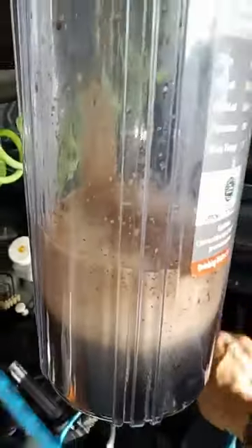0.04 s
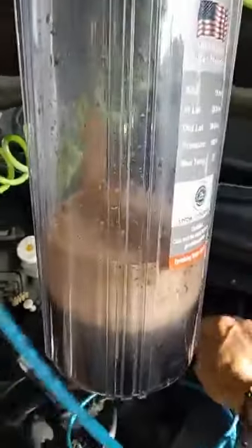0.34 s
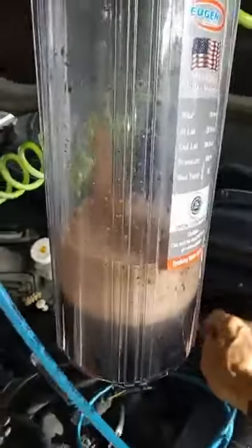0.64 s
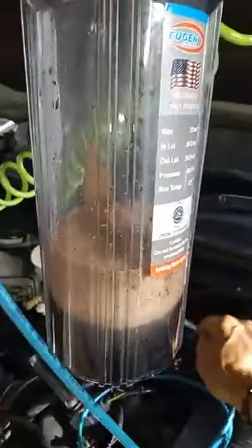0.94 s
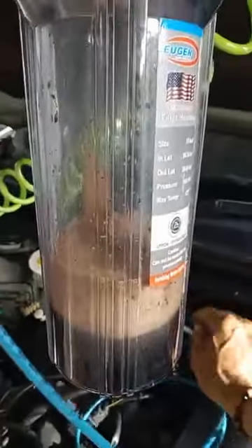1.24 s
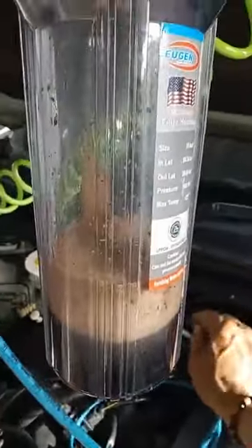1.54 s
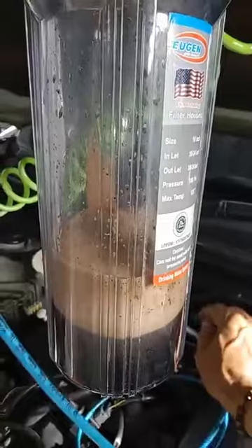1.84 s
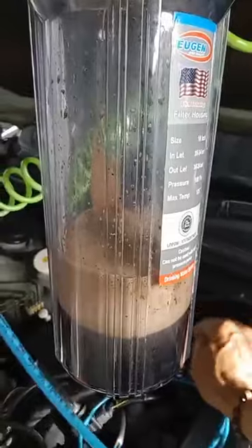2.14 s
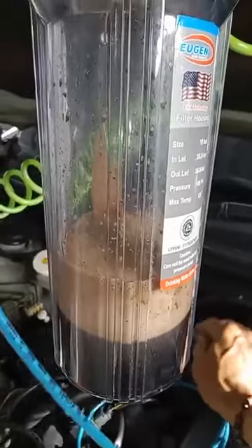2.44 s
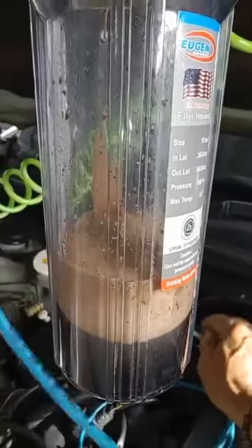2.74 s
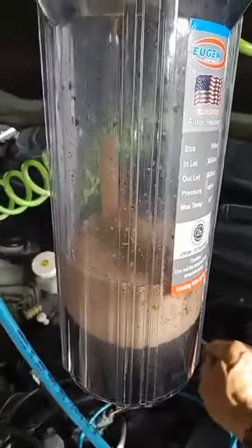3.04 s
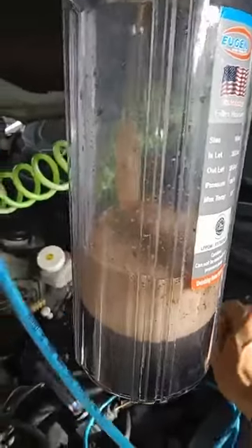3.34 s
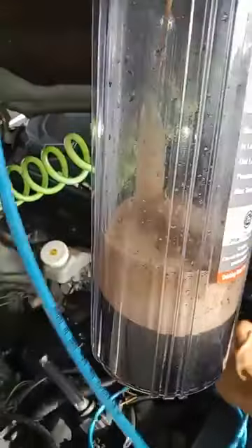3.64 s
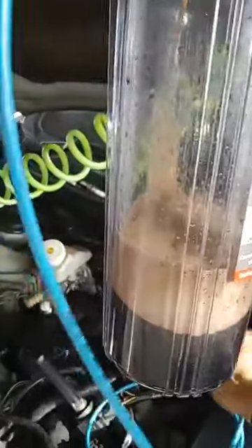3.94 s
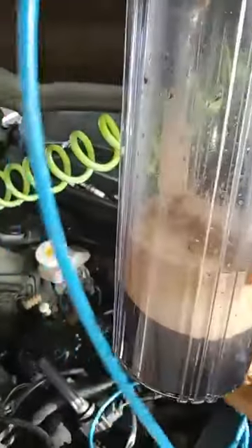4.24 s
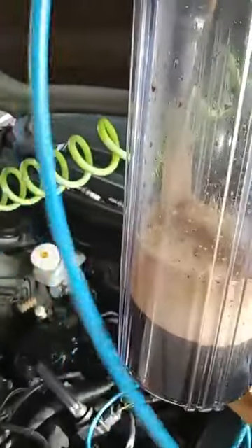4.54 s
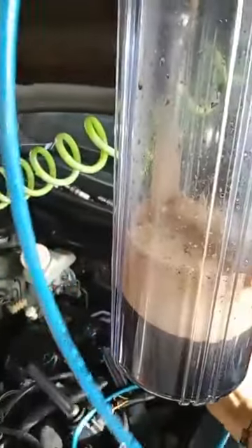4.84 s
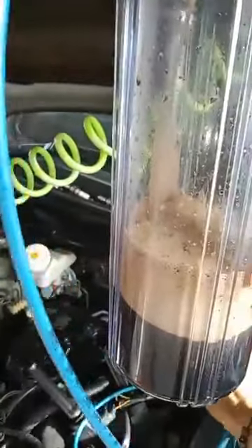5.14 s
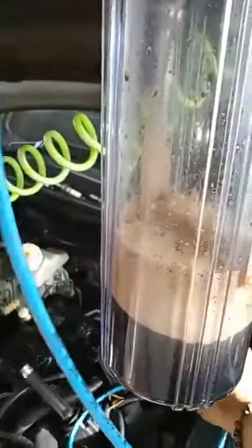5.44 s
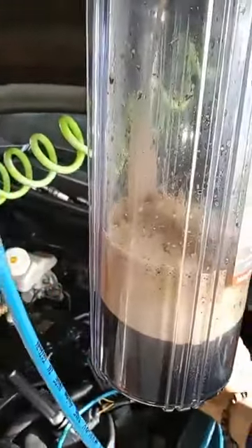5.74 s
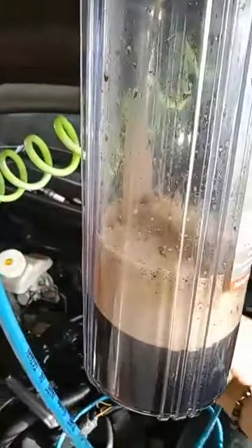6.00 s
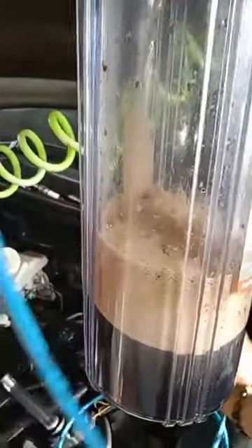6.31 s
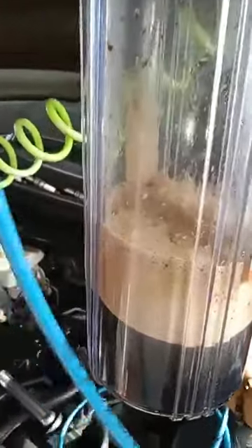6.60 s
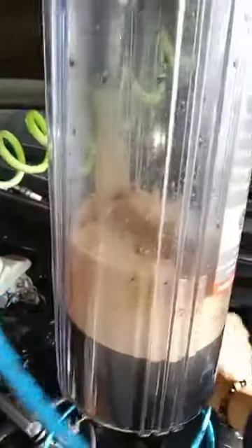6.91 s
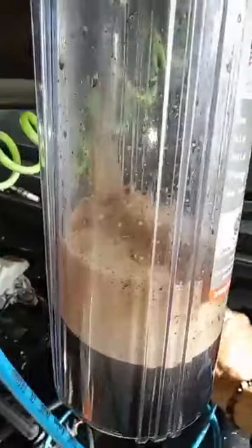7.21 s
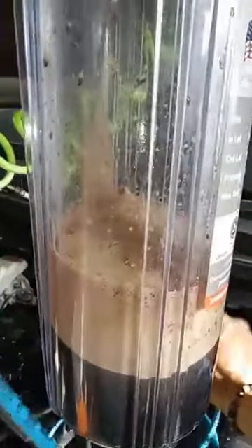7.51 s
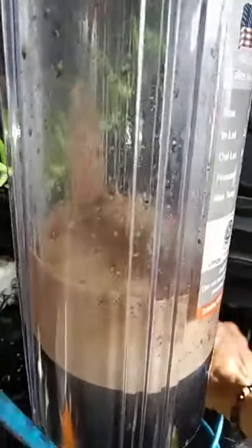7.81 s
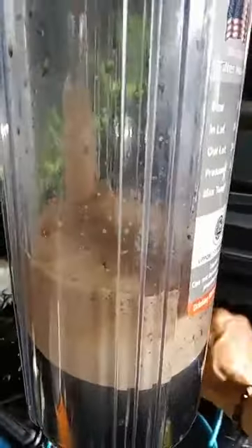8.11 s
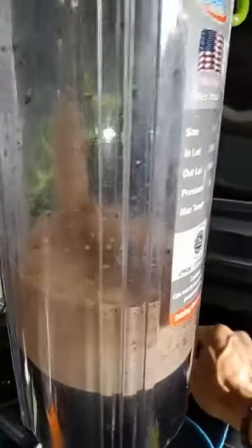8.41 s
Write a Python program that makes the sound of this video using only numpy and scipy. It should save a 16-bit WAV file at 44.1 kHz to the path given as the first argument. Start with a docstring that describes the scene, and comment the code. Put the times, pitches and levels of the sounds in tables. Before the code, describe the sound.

A suction pump runs with a steady low hum while liquid jets into a filter canister with a bright, even hiss. Spray sizzles against the wall, froth fizzes and a faint high whine sits on top. The close, hand-held microphone drifts around the canister, so the hiss slowly changes colour. Near the end come a few soft handling knocks.

```python
"""A steady vacuum-pump hum under the hiss of foaming liquid sucked into a filter canister.
The pump puffs once a turn and a valve sings faintly in step. The jet rings the air in hose and
canister, spray sizzles on the wall and the froth fizzes. A hand-held microphone drifts around it,
so close reflections shift the colour of the hiss; a few soft handling knocks come late."""
import sys
import numpy as np
from scipy import signal
from scipy.fft import rfft, irfft, next_fast_len
from scipy.io import wavfile
from scipy.ndimage import map_coordinates

SR = 44100
rng = np.random.default_rng(int(sys.argv[2]) if len(sys.argv) > 2 else 0)


def unload_audio(sound):
    """Save the sound as a 16-bit wav file, at the path given as the first command line argument."""
    columns = np.transpose(np.atleast_2d(sound))
    # keep every value between -1 and 1, then stretch to whole-number steps
    steps = np.round(np.clip(columns, -1, 1) * 32767)
    wavfile.write(sys.argv[1], SR, steps.astype(np.int16))


N = 377496
TIME = np.arange(N) / SR
PUMP_HZ = 45.6


def amp(db):
    """Decibels to gain."""
    return 10 ** (np.asarray(db) / 20)


def unit(x):
    """Scaled to rms 1."""
    return x / np.sqrt(np.mean(x ** 2))


def curves(rows):
    """One value per sample for each column after the time."""
    time_s, *columns = np.transpose(rows)
    return [np.interp(TIME, time_s, column) for column in columns]


def wobble(rate_hz):
    """Smooth random curve, rate_hz knots a second."""
    return map_coordinates(rng.standard_normal(int(N * rate_hz / SR) + 4), [TIME * rate_hz])


def filtered(x, response):
    """Zero-phase filter of gain response(hz)."""
    size = next_fast_len(N + SR // 4)
    return irfft(rfft(x, size) * response(np.fft.rfftfreq(size, 1 / SR)), size)[:N]


def coloured(x, spectrum):
    """x shaped by (freq_hz, gain_db) points, at rms 1."""
    freq_hz, gain_db = np.transpose(spectrum)
    return unit(filtered(x, lambda hz: amp(np.interp(np.log(hz + 1), np.log(freq_hz), gain_db))))


def rush(spectrum):
    """Smooth turbulent noise."""
    return coloured(rng.standard_normal(N), spectrum)


def droplets(spectrum, rate_hz, grain_db):
    """Tiny impacts of random size on a bed of turbulence."""
    hits = (rng.random(N) < rate_hz / SR) * rng.standard_normal(N)
    return coloured(rng.standard_normal(N) + amp(grain_db) * unit(hits), spectrum)


# Drift round and back from the canister: time_s, around_fraction, back_fraction
MIC_PATH = [(0, .6, 0), (.5, .2, 0.27), (1.05, 0.03, 0.43), (2.2, 0.1, 0.52), (3.1, 0.14, .48),
            (3.4, 0.63, .72), (4.4, 0.79, 0.91), (5.2, 0.77, .85), (6, 0.85, 0.29), (6.4, 0.81, 0.1),
            (7.3, 0.87, 0.09), (8.56, 0.94, 0.05)]


def at_mic(triple):
    """Value along the microphone's path of a mic triple: (base, change around, change back)."""
    base, per_around, per_back = triple
    around, back = curves(MIC_PATH)
    return base + per_around * around + per_back * back


# Pump overtones before and after the microphone's move: harmonic, gain_db
HUM_BEFORE = [(1, -43), (2, -20), (3, -18), (4, -11), (5, -9), (6, -12.5), (7, -1.5), (8, -11), (9, -15.5),
              (10, -6.5), (11, -19), (12, 0), (13, -5), (14, -3), (15, -4), (16, -25), (17, -19),
              (18, -9.5), (19, -19), (20, -10.5), (21, -18), (22, -11), (23, -13.5), (24, -15), (25, -32),
              (26, -20), (27, -32), (28, -13), (29, -11.5), (30, -14.5), (31, -21), (32, -14), (33, -26)]
HUM_AFTER = [(1, -46), (2, -15.5), (3, -16), (4, -8.5), (5, -8), (6, -14), (7, 0), (8, -9), (9, -19.5),
             (10, -5), (11, -32), (12, 0.5), (13, -6), (14, -2), (15, -4.5), (16, -21.5), (17, -14),
             (18, -4), (19, -26), (20, -14.5), (21, -10.5), (22, -20), (23, -8.5), (24, -11), (25, -15),
             (26, -10), (27, -20), (28, -16), (29, -8.5), (30, -16), (31, -18), (32, -12.5), (33, -13.5)]


def pump(turns, outlet_hz=600, width_hz=200, housing_db=-44.5, waver_db=0.6, move_s=(2.6, 5.2)):
    """One puff a turn rings the outlet; outside its band the housing smears overtones into a drone."""
    moved = np.interp(TIME, move_s, (0, 1))
    outlet_db, buzz_db = -41.5 - 3 * moved, -41 - 5 * moved
    smear_rad = 0.2 + 0.6 * moved
    out = np.zeros(N)
    for (harmonic, before_db), (_, after_db) in zip(HUM_BEFORE, HUM_AFTER):
        detuning = (harmonic * PUMP_HZ - outlet_hz) / width_hz
        phase = smear_rad * rng.standard_normal() + detuning ** 4 * rng.standard_normal()
        band_db = housing_db if detuning < -1 else buzz_db if detuning > 1 else outlet_db
        rms = amp(band_db + before_db + moved * (after_db - before_db) + waver_db * wobble(6))
        out += rms * np.sqrt(2) * np.cos(2 * np.pi * harmonic * turns + phase)
    return out


# Valve tones, snapped to pump harmonics: pitch_hz, level_db
VALVE_TONES = [(7434, -51), (7569, -47), (7660, -47), (7752, -47), (7800, -46), (7843, -45), (8027, -45),
               (8075, -45), (8258, -45), (8301, -44)]
# Valve swell: time_s, gain_db
VALVE_SWELL = [(0, -5), (.5, 2), (2.8, 6), (3.8, -9), (5.5, -9), (7, 0), (8.56, -2)]


def valve(turns, waver_db=2):
    """The valve rings once a turn, so it sings on high multiples of the pump rate."""
    out = np.zeros(N)
    for pitch_hz, level_db in VALVE_TONES:
        phase = 2 * np.pi * (np.round(pitch_hz / PUMP_HZ) * turns + rng.random())
        out += amp(level_db + waver_db * wobble(2.4)) * np.sin(phase)
    return out * amp(curves(VALVE_SWELL)[0])


# Air resonances: centre_hz, slide_around_hz, width_hz
AIR_MODES = [(2354, -130, 630), (3154, 200, 1500), (3940, 230, 540), (5050, 420, 720), (6624, 440, 460)]
# Level of each resonance: base_db, around_db, back_db
AIR_MODE_LEVELS = [(-36.5, 0.19, -2.3), (-41.5, 8.5, -3), (-57, 18, 6.5), (-53.5, 10.5, 8),
                   (-39.5, 2.4, 1.7)]


def hollows():
    """Turbulence rings the air in hose and canister; the bands slide as the microphone goes round."""
    out = np.zeros(N)
    for (centre_hz, slide_hz, width_hz), level_db in zip(AIR_MODES, AIR_MODE_LEVELS):
        phase = 2 * np.pi * np.cumsum(at_mic((centre_hz, slide_hz, 0))) / SR
        in_phase, quadrature = (filtered(noise, lambda hz: 1 / (1 + (2 * hz / width_hz) ** 4))
                                for noise in rng.standard_normal((2, N)))
        band = unit(in_phase * np.cos(phase) + quadrature * np.sin(phase))
        out += amp(at_mic(level_db)) * band
    return out


# Reflection delays: base_ms, around_ms, back_ms
REFLECTION_DELAYS = [(0.547, 0.26, 0.017), (0.88, -0.25, 0.49), (0.313, 0.12, .01)]


def reflected(x, gains=(-0.14, -0.12, -0.09)):
    """Close reflections comb the sound; their delays slide as the microphone moves."""
    out = x.copy()
    for gain, delay_ms in zip(gains, REFLECTION_DELAYS):
        out += gain * map_coordinates(x, [np.arange(N) - at_mic(delay_ms) * SR / 1000])
    return out


# Standing-wave nulls: centre_hz (mic triple), depth_fraction (mic triple), width_hz
STANDING_NULLS = [((1837, -18, 10), (.6, -0.32, .15), 140), ((2820, -150, 30), (0.11, 0.41, -.2), 140),
                  ((3500, 500, -250), (0.54, .22, -.3), 190), ((4550, 620, -30), (.03, 0.36, .03), 220),
                  ((5550, 470, -250), (0.57, .2, -.45), 200)]


def through_nulls(x):
    """Standing waves cancel narrow bands; frequency and depth follow the microphone."""
    hz, frame_s, spectra = signal.stft(x, SR, nperseg=1024)
    for centre_hz, depth, width_hz in STANDING_NULLS:
        null_hz = np.interp(frame_s, TIME, at_mic(centre_hz))
        cancel = np.interp(frame_s, TIME, at_mic(depth))
        band = np.exp(-(2 * (hz[:, None] - null_hz) / width_hz) ** 2)
        spectra *= 1 - np.clip(cancel, 0, 1) * band
    return signal.istft(spectra, SR)[1][:N]


# Spectra of jet hiss, low rumble and moving air: freq_hz, gain_db
HISS_SPECTRUM = [(500, -28.5), (1400, -12.5), (1850, -10.5), (2050, -6), (2700, 0), (3500, -1.5),
                 (4000, -2.5), (4600, -1), (5100, 0), (5900, -6.5), (6500, 0.5), (7400, -3.5),
                 (9000, -10.5), (14000, -13.5)]
RUMBLE_SPECTRUM = [(20, -50), (45, -33), (65, -26), (88, 0.5), (130, -0.5), (170, 3.5), (230, -2),
                   (400, -2.5), (900, -10.5), (2000, -40)]
AIR_SPECTRUM = [(100, -35), (250, -3), (400, -4.5), (500, -0.5), (620, 5), (760, -4.5), (950, 3),
                (1150, -6), (1500, 0.5), (1850, -1), (3000, -16)]
# Rumble envelope: time_s, level_db
RUMBLE_SWELL = [(0, -45), (.7, -53.5), (1.5, -47.5), (3.8, -47), (5.3, -51), (6.3, -44), (6.95, -48.5),
                (7.4, -43.5), (8.56, -42)]


def jet(hiss_db=(-28, -1, 1.2), air_db=(-39.5, -1.1, -3.5)):
    """The inrushing jet hisses and rings the hollows, over a low rumble of moving air."""
    hiss = amp(at_mic(hiss_db)) * droplets(HISS_SPECTRUM, rate_hz=2500, grain_db=-8)
    ringing = hollows()
    surge = amp(0.24 * wobble(14))
    rumble = amp(curves(RUMBLE_SWELL)[0] + 2.3 * wobble(8)) * rush(RUMBLE_SPECTRUM)
    air = amp(at_mic(air_db)) * rush(AIR_SPECTRUM)
    return through_nulls(reflected(surge * (hiss + ringing)) + air) + rumble


# Harder spurts of spray: centre_s, half_width_s, boost_db
SPRAY_SPURTS = [(.4, .2, 0), (2.7, 0.22, 1.2), (6.25, 0.1, 2.5), (8.5, 0.21, 4)]
# Spectra of wall sizzle, mist and froth: freq_hz, gain_db
SIZZLE_SPECTRUM = [(6500, -36), (7350, -20), (7650, -1.5), (8250, 0.5), (8550, 5), (8750, 3), (8980, 5.5),
                   (9200, -13), (10500, -39)]
MIST_SPECTRUM = [(7500, -18), (8800, -6.5), (9200, 1), (10450, -0.5), (10650, -10.5), (12500, -15),
                 (14000, -16), (16000, -11.5)]
FROTH_SPECTRUM = [(10000, -35), (12500, -19), (14100, -12), (14300, -7), (14850, -6), (15050, 0),
                  (15700, 1)]


def spray(sizzle_db=(-25.5, -2.6, -4.5), mist_db=(-28, 1, -3), froth_db=(-31.5, 9.5, 1)):
    """Spray sizzles on the wall, mist hisses and froth fizzes in bursts; each beams its own way."""
    flutter_db = unit(wobble(25) + wobble(70))
    spurt_db = 0.57 * wobble(6)
    for centre_s, half_width_s, boost_db in SPRAY_SPURTS:
        spurt_db += boost_db * np.exp(-((TIME - centre_s) / half_width_s) ** 2)
    burst_db = 1.5 * wobble(35)
    sizzle = droplets(SIZZLE_SPECTRUM, rate_hz=2500, grain_db=-6)
    mist = droplets(MIST_SPECTRUM, rate_hz=1500, grain_db=-4)
    froth = droplets(FROTH_SPECTRUM, rate_hz=900, grain_db=-6)
    return (amp(at_mic(sizzle_db) + spurt_db + flutter_db) * sizzle
            + amp(at_mic(mist_db) + 0.9 * flutter_db) * mist
            + amp(at_mic(froth_db) + burst_db) * froth)


# Handling knocks: start_s, level_db
HANDLING_KNOCKS = [(6.7145, -11.5), (7.488, -21), (7.693, -17), (7.992, -23), (8.167, -17.5), (8.234, -24),
                   (8.293, -18), (8.469, -19)]


def knocks(push_s=0.0012, rise_s=0.00011, body_hz=150, body_t60_s=0.015, tick_hz=1050, tick_t60_s=0.0053):
    """Handling knocks: one short push, a light tick and a dull ring that dies at once."""
    t = np.arange(SR // 10) / SR
    push = (1 - t / push_s) * np.exp(-t / push_s)
    body = 0.33 * np.sin(2 * np.pi * body_hz * t) * amp(-60 * t / body_t60_s)
    tick = 0.3 * np.sin(2 * np.pi * tick_hz * t) * amp(-60 * t / tick_t60_s)
    knock = (push + body + tick) * (1 - np.exp(-t / rise_s))
    knock /= np.abs(knock).max()
    out = np.zeros(N + SR)
    for start_s, level_db in HANDLING_KNOCKS:
        out[round(start_s * SR):][:len(t)] -= amp(level_db) * knock
    return out[:N]


def scene():
    """Pump and canister heard at one point, alike in both ears."""
    first_puff_s = 0.0128
    speed_hz = PUMP_HZ * (1 + 0.000273 * wobble(4))
    turns = np.cumsum(speed_hz) / SR - first_puff_s * PUMP_HZ
    mono = pump(turns) + valve(turns) + jet() + spray() + knocks()
    return np.array([mono, mono])


def record(dry):
    """The microphone sheds the deep bass; a hard band limit cuts the top treble."""
    low_hz, top_hz = 55, 15760
    thin = signal.sosfilt(signal.butter(2, low_hz, "highpass", fs=SR, output="sos"), dry)
    return np.array([filtered(channel, lambda hz: hz < top_hz) for channel in thin])


dry = scene()
out = record(dry)
unload_audio(out)
```